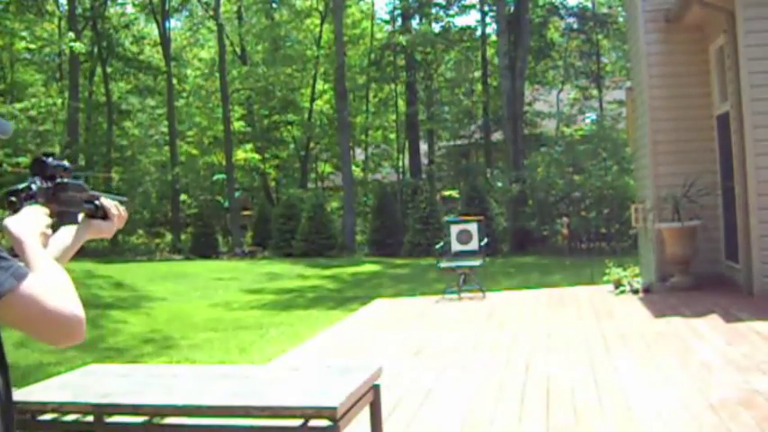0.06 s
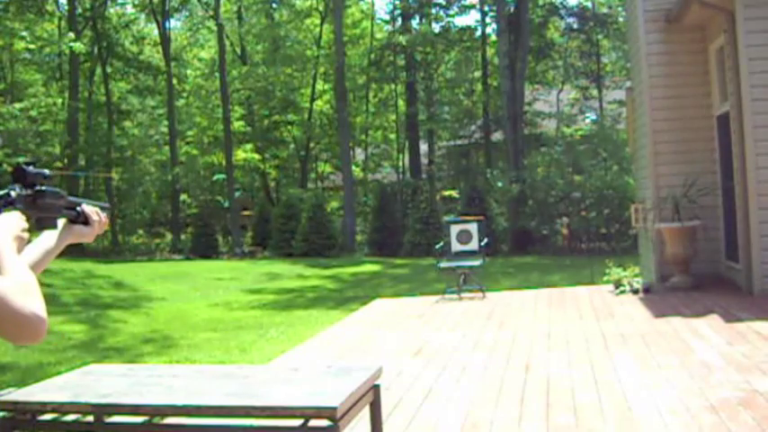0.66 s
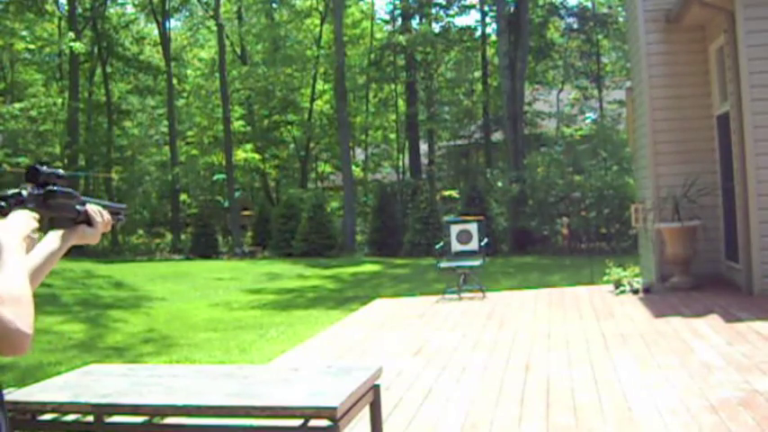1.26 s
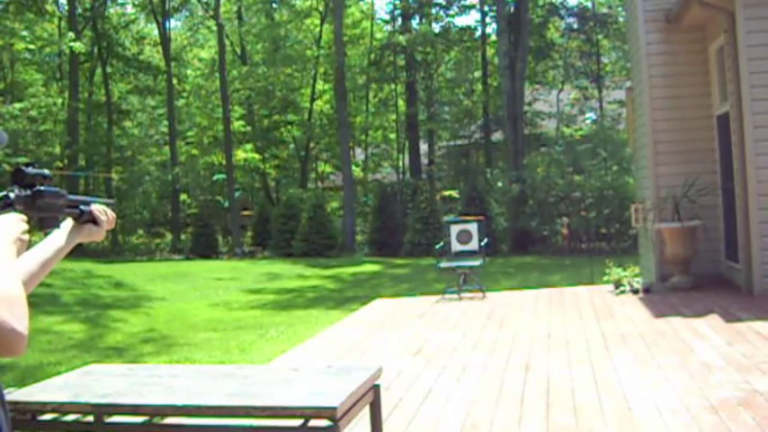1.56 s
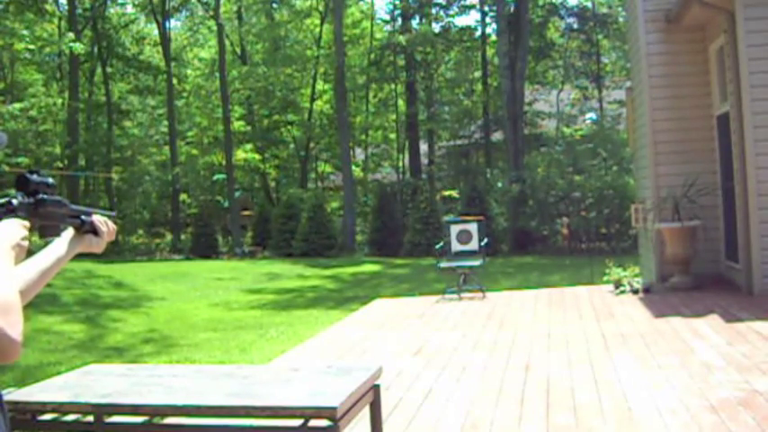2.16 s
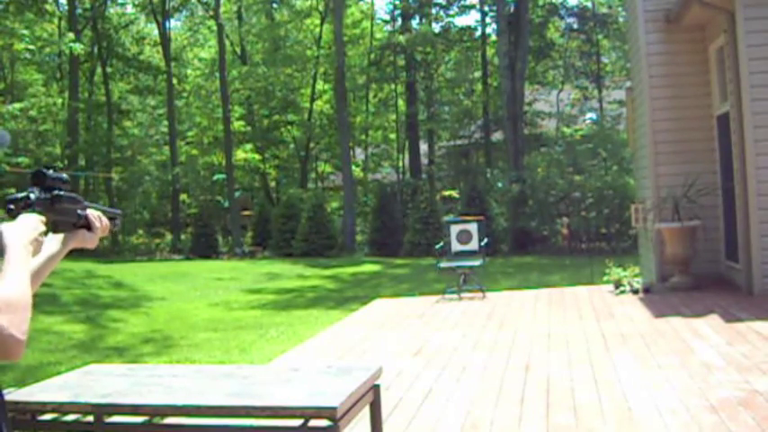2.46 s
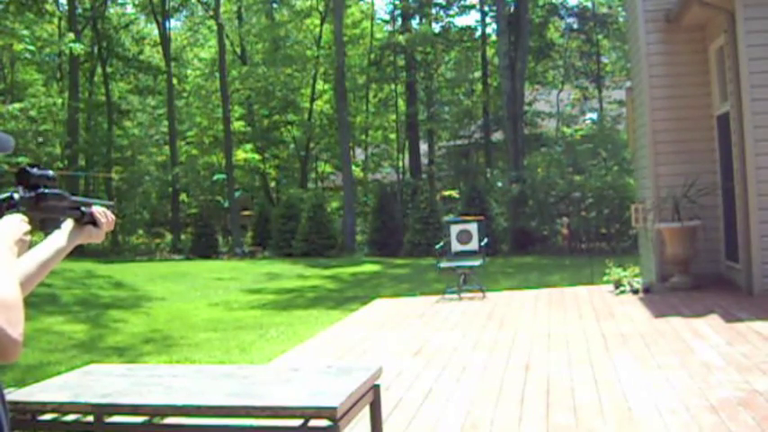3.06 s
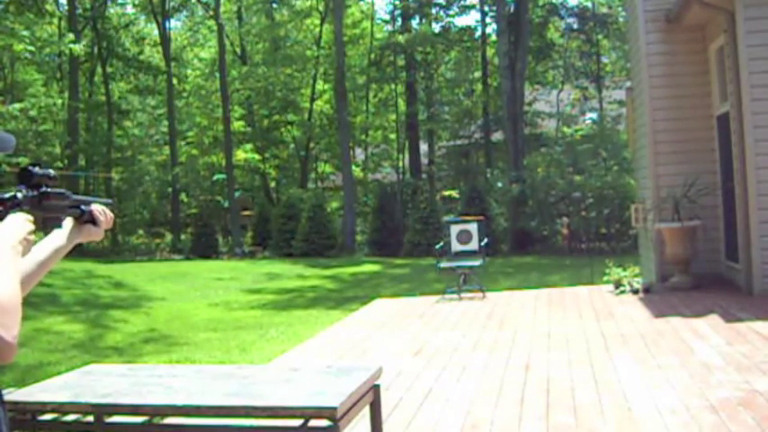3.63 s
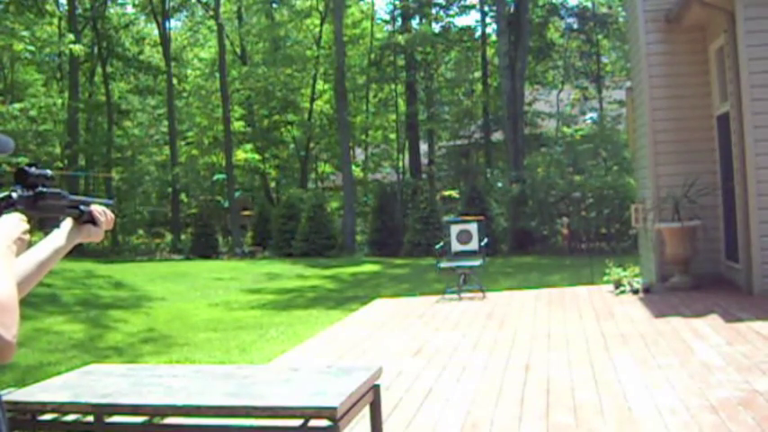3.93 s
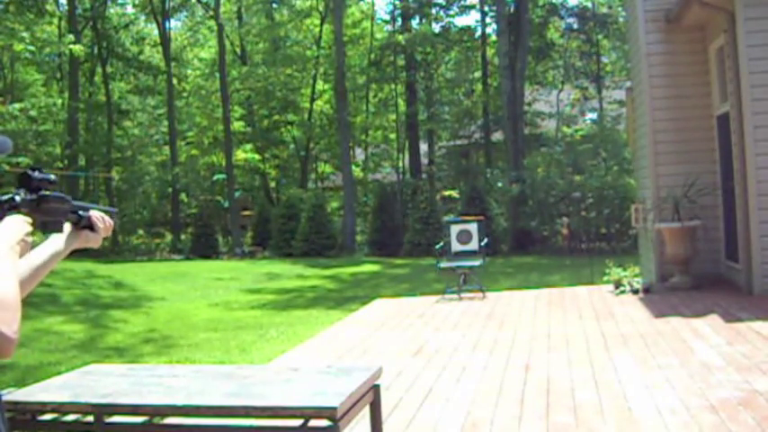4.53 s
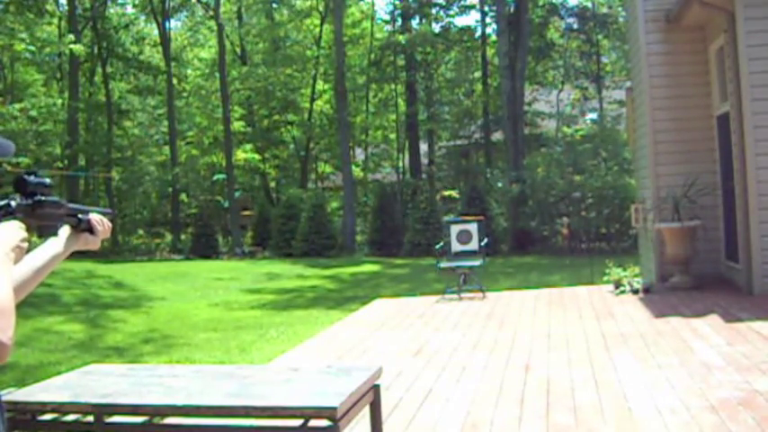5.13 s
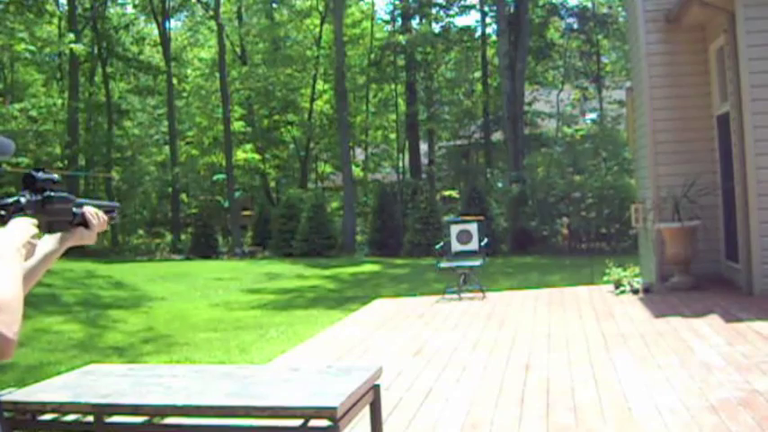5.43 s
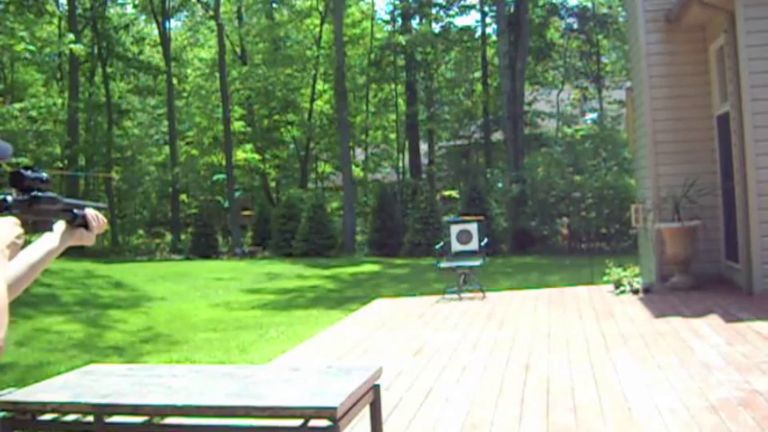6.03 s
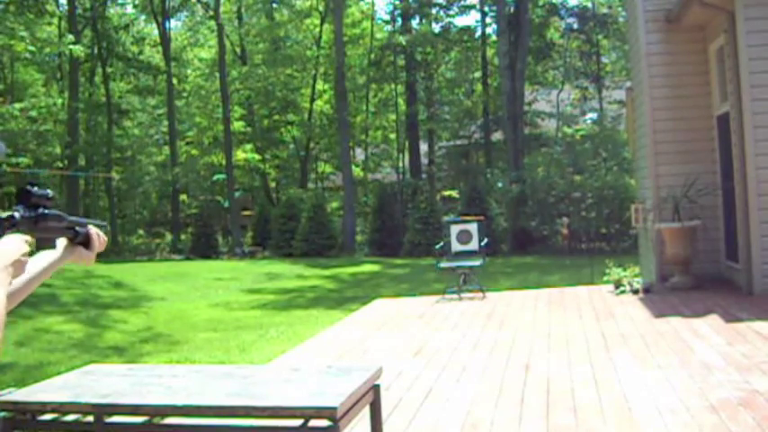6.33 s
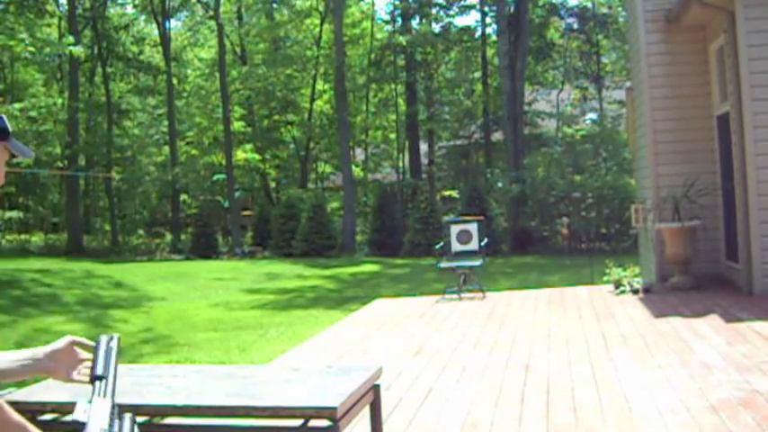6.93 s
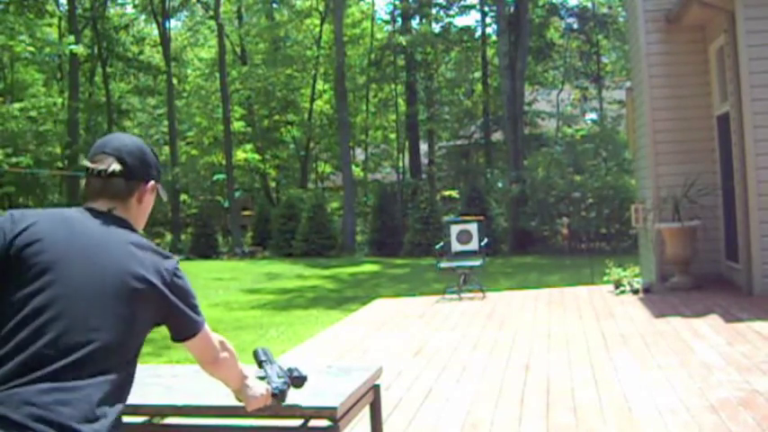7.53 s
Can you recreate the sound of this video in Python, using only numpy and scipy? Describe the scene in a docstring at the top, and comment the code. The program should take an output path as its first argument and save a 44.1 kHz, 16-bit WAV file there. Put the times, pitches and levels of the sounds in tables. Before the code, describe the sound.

A spring-powered toy shotgun fires six times, about once a second, each shot a sharp clack with a pop of air. Between shots the plastic pump clatters back and slams shut. Four pellets crack against a target that rings faintly. Finally the gun is set on a table with light taps. The back yard adds short echoes and soft outdoor air, heard through a dull microphone that overloads slightly.

```python
"""A spring airsoft shotgun is fired six times in a back yard, pumped between shots, then laid on a table.
Each shot is a trigger click, a piston slam and a pop of air; four pellets hit a target, which rings on.
House wall and trees throw the clacks back over outdoor air and the faint hum of a distant machine.
A narrow-band camera microphone overloads on the loudest hits."""
import sys
import numpy as np
from scipy import signal
from scipy.fft import rfft, irfft, next_fast_len
from scipy.io import wavfile
from scipy.ndimage import uniform_filter1d

SR = 44100
rng = np.random.default_rng(int(sys.argv[2]) if len(sys.argv) > 2 else 0)


def unload_wav(signal):
    """Save mono or channel-first audio to the path in sys.argv[1] as 16-bit WAV at rate SR, clipped to [-1, 1]."""
    wavfile.write(
        sys.argv[1],
        SR,
        np.round(np.clip(np.atleast_2d(signal).T, -1, 1) * 32767).astype(np.int16),
    )


N = 343358
MIC_BAND_HZ = 3672
BOUNCE_S = .0052  # time between rebounds against a stop

# The six shots. Each row: slam time in seconds, slam level in dB, rattle length in seconds,
# stock thump in dB, muzzle pop in dB, pop pitch in Hz, barrel note in dB against the pop,
# slam tilt in dB per octave, trigger lead in seconds, trigger level in dB.
SHOTS = [(0.993, 1, .006, -8, -21, 2800, -15, 6.5, .0053, -14),
         (2.1084, 2, .0054, -7.5, 0, 1830, -14.5, 0, .0088, -6.5),
         (3.3395, -3, .008, -7.5, -14.5, 1860, -10, .8, .0058, -9),
         (4.3227, -2.5, .0084, -8, -12.5, 1900, -16, 0, .0051, -4.5),
         (5.2939, -3.5, .008, -9, -11.5, 1960, -19, -.5, .0063, -9),
         (6.24, 1, .0066, -7, -9, 2030, 3, .5, .0077, -9.5)]
# Tone of the pump rail. Each row: frequency in Hz, level in dB.
RAIL_TONE = [(80, -28), (250, -19), (440, -4), (850, -8.5), (1230, -16), (1700, -10), (2100, 3), (2600, 0),
             (3100, -0.5), (3700, -1.5)]
# Tone of the gun's shell. Each row: frequency in Hz, level in dB.
SHELL_TONE = [(100, -21), (600, -2.5), (1250, -15.5), (2200, -0.5), (3000, 5), (3800, -4)]


def amp(db):
    return 10 ** (np.asarray(db) / 20)


def unit_rms(x):
    return x / np.sqrt(np.mean(x ** 2) + 1e-20)


def curve(points, hz):
    """Straight lines between points on a log-frequency axis."""
    f, value = np.transpose(points)
    return np.interp(np.log(hz + 1), np.log(f + 1), value)


def add(mix, start_s, sound):
    part = mix[round(start_s * SR):][:len(sound)]
    part += sound[:len(part)]


def drift(rate_hz):
    """A slow random wander of unit size."""
    hz = np.fft.rfftfreq(N, 1 / SR)
    return unit_rms(irfft(rfft(rng.standard_normal(N)) / (1 + (hz / rate_hz) ** 4), N))


def colour(x, tone, tilt_db=0):
    """Minimum-phase EQ with a tilt per octave, closed above the microphone's band."""
    size = next_fast_len(2 * len(x))
    hz = abs(np.fft.fftfreq(size, 1 / SR))
    db = curve(tone, hz) + tilt_db * np.log2((hz + 200) / 2000) - np.clip((hz - 3900) / 15, 0, 50)
    response = np.exp(np.conj(signal.hilbert(np.log(amp(db)))))
    return np.fft.ifft(np.fft.fft(x, size) * response).real[:len(x)]


def flatten(x, window):
    """Spreads a burst evenly over all frequencies while keeping it inside its time window."""
    for _ in range(4):
        z = rfft(x)
        x = irfft(z / (abs(z) + 1e-12), len(x)) * window
    return x


def burst(decay_s):
    """A dying puff of noise with an even spectrum."""
    t = np.arange(4096) / SR
    noise = rng.standard_normal(len(t)) * np.exp(-t / decay_s)
    return flatten(noise, np.exp(-(t / (3.4 * decay_s)) ** 2))


def knock(tone, ring_s, tilt_db=0):
    """A blow on crowded, quickly dying modes; its first moments have about unit level."""
    x = colour(burst(ring_s), tone, tilt_db)
    return x * np.sqrt((ring_s / 2 + .0006) * SR / np.sum(x ** 2))


def bounces(tone, ring_s, loss_db, count=4, jitter=.2):
    """A blow against a stop and its ever weaker, slightly uneven rebounds."""
    out = np.zeros(SR // 5)
    for k, chance in enumerate(rng.uniform(-1, 1, count)):
        delay = BOUNCE_S * (k + jitter * chance * min(k, 1))
        add(out, delay, amp(loss_db * np.log2(1 + k)) * knock(tone, ring_s))
    return out


def slide(length_s, slips_per_s=2200):
    """Tiny slips of plastic that swell and fade over one stroke."""
    n = round(length_s * SR)
    slips = rng.choice([-1, 1], n) * (rng.random(n) < slips_per_s / SR)
    strength = amp(np.minimum(rng.exponential(1, n), 3))
    return unit_rms(colour(slips * strength, RAIL_TONE)) * signal.windows.tukey(n, .5)


def air_and_hum():
    """A bed of outdoor air and hiss, with the wavering hum of a distant machine."""
    # Tone of the air. Each row: frequency in Hz, relative level in dB.
    air_tone = [(12, -36.5), (20, -7.5), (59, -7), (92, 2), (130, -11.5), (148, -12.5), (281, -14.5),
                (388, -15.5), (492, -10), (596, -17), (806, -13.5), (917, -17.5), (1110, -19.5),
                (1670, -21), (3400, -24)]
    # The machine's notes. Each row: frequency in Hz, level in dB.
    hum_notes = [(87.5, -44), (120.2, -45.5)]
    hz, t = np.fft.rfftfreq(N, 1 / SR), np.arange(N) / SR
    spectrum = rfft(rng.standard_normal(N)) * amp(curve(air_tone, hz)) * (hz < 4200)
    spectrum *= amp(curve([(50, 1), (80, -8.5), (120, -6.5), (170, 0)], hz))  # room for the hum
    air = irfft(spectrum, N) / np.std(irfft(spectrum * (hz > 150), N))
    hum = np.zeros(N)
    for note_hz, db in hum_notes:
        level = amp(db + 2.1 * drift(3.16)) * np.sqrt(2)
        hum += level * np.sin(2 * np.pi * note_hz * t + .63 * drift(2))
    return amp(-39) * air * amp(.5 * drift(3.53)) + hum


def handling(squeeze_lead_s=.037, squeeze_db=-31, table_knocks=3):
    """The shell taps in the hands, the trigger creaks, and at last the gun scrapes onto the table."""
    # Taps on the shell. Each row: start in seconds, level in dB.
    taps = [(.431, -26), (.4624, -25), (.9124, -24), (2.323, -25), (5.5279, -22), (7.5325, -19)]
    # Laying the gun down: start and end in seconds, scrape level and knock level in dB.
    lay_down = (7.604, 7.741, -48, -33)
    out = np.zeros(N)
    squeezes = [(shot[0] - squeeze_lead_s, squeeze_db) for shot in SHOTS]
    for start, db in taps + squeezes:
        add(out, start, amp(db) * knock(SHELL_TONE, .0018))
    start, end, scrape_db, knock_db = lay_down
    add(out, start, amp(scrape_db) * slide(end - start))
    for k, chance in enumerate(rng.uniform(-.15, .15, table_knocks)):
        progress = (k + 1 + chance) / (table_knocks + 1)
        add(out, start + (end - start) * progress, amp(knock_db) * knock(SHELL_TONE, .0018))
    return out


def shots(rush_db=-19, pop_width_hz=560, barrel_hz=1010, barrel_width_hz=440):
    """The trigger trips, the piston rushes, slams into the stock and rattles; air pops from the barrel."""
    # Tone of the piston's clack. Each row: frequency in Hz, level in dB.
    piston_tone = [(60, -35.5), (170, -13.5), (400, -19), (930, -7.5), (1250, -21.5), (1600, -8),
                   (2100, 0.5), (2500, -4.5), (3200, -4.5), (3800, -16.5)]
    # Tone of the stock's thump. Each row: frequency in Hz, level in dB.
    stock_tone = [(60, -23), (200, -8), (330, -7.5), (490, 2), (690, -7.5), (950, -1), (1250, -23),
                  (3000, -31.5)]
    gun, muzzle, hz = np.zeros(N), np.zeros(N), np.fft.rfftfreq(1024, 1 / SR)
    for slam, db, rattle, thump_db, pop_db, pop_hz, barrel_db, tilt_db, lead, trigger_db in SHOTS:
        add(gun, slam - lead, amp(trigger_db) * knock(SHELL_TONE, .0016))
        add(gun, slam - lead, amp(rush_db) * slide(lead + rattle))
        for share, bounce_db in [(0, -3), (.42, 5.5), (.9, 1.5)]:
            add(gun, slam + share * rattle, amp(db + bounce_db) * knock(piston_tone, .0024, tilt_db))
        add(gun, slam + .001, amp(thump_db) * knock(stock_tone, .0055))
        # the air column has two broad resonances
        pop = 1 / (1 + (2 * (hz - pop_hz) / pop_width_hz) ** 2)
        barrel = amp(barrel_db) / (1 + (2 * (hz - barrel_hz) / barrel_width_hz) ** 2)
        column_tone = np.c_[hz, 20 * np.log10(pop + barrel)]
        add(muzzle, slam, amp(pop_db) * knock(column_tone, .009))
    return gun, muzzle


def pump_back(margin_s=.024):
    """The pump unlocks, slides back and clatters against its stop; then the sear catches the piston."""
    # Back strokes. Each row: time in seconds and level in dB for the unlock, the back stop
    # and the sear in turn, then slide level in dB.
    strokes = [(1.5164, -11.5, 1.5603, -9, 1.5708, -8.5, -30), (2.7074, -15, 2.7578, -8.5, 2.790, -15, -30),
               (3.671, -19.5, 3.7333, -10, 3.765, -9, -32), (4.6495, -19, 4.7122, -10, 4.7465, -17, -34),
               (5.6165, -19, 5.6732, -11, 5.7028, -12.5, -31)]
    # Tone of the sear's click. Each row: frequency in Hz, level in dB.
    sear_tone = [(100, -31.5), (400, -17), (800, -10), (1200, -37), (1950, -26.5), (2420, 4.5),
                 (2800, -0.5), (3300, -7), (3800, -25.5)]
    out = np.zeros(N)
    for unlock, unlock_db, stop, stop_db, sear, sear_db, slide_db in strokes:
        add(out, unlock - .0055, amp(unlock_db - 6.5) * knock(RAIL_TONE, .002))  # slack is taken up
        add(out, unlock, amp(unlock_db) * knock(RAIL_TONE, .0032))
        add(out, unlock - margin_s, amp(slide_db) * slide(sear - unlock + 2 * margin_s))
        add(out, stop - .0105, amp(stop_db - 12) * knock(RAIL_TONE, .003))  # catches on the rail
        add(out, stop, amp(stop_db) * bounces(RAIL_TONE, .0025, loss_db=-9))
        add(out, sear, amp(sear_db) * knock(sear_tone, .0018))
    return out


def pump_forward(margin_s=.016):
    """The feed clicks and seats a pellet; the pump slides home, meets its stop, grinds and slams shut."""
    # Forward strokes. Each row: time in seconds and level in dB for the feed click, the first touch
    # and the closing slam in turn, then slide level in dB.
    strokes = [(1.7046, -16, 1.7655, -5.5, 1.7705, -2, -37), (2.922, -19, 2.994, -6.5, 2.9985, -2.5, -36),
               (3.873, -19, 3.944, -11, 3.955, -2.5, -37), (4.859, -19, 4.941, -9, 4.9458, -2.5, -39),
               (5.8278, -20.5, 5.9046, -11, 5.9188, -3.8, -38)]
    # Tone of the feed's click. Each row: frequency in Hz, level in dB.
    feed_tone = [(100, -27.5), (450, -16.5), (780, -6.5), (1250, -30.5), (1750, -20.5), (2120, 6.5),
                 (2550, -14), (3200, -9.5), (3800, -21.5)]
    # Tone of the front stop. Each row: frequency in Hz, level in dB.
    stop_tone = [(70, -48.5), (220, -22), (430, 0.5), (700, 0.5), (950, -3), (1260, -18.5), (1700, -5.5),
                 (2250, 3), (2800, 2.5), (3500, -1), (3800, -4)]
    out = np.zeros(N)
    for feed, feed_db, touch, touch_db, shut, shut_db, slide_db in strokes:
        add(out, feed, amp(feed_db) * knock(feed_tone, .0018))
        add(out, feed + .034, amp(feed_db - 12) * knock(SHELL_TONE, .0018))  # the pellet seats
        add(out, feed - margin_s, amp(slide_db) * slide(shut - feed + 2 * margin_s))
        add(out, touch, amp(touch_db) * bounces(stop_tone, .0022, loss_db=-6, count=2))
        add(out, touch, amp(touch_db - 10) * slide(shut - touch + BOUNCE_S))  # the grind
        add(out, shut, amp(shut_db) * bounces(stop_tone, .0018, loss_db=-7, count=3))
    return out


def target_hits(waver_db=3, bloom_s=.06):
    """Each pellet cracks on the face; the backing thuds and the loose stand blooms into a wavering ring."""
    # Pellet hits. Each row: start in seconds, crack level in dB, crack tilt in dB per octave,
    # then the levels of scattered crack, ring and thud in dB.
    pellets = [(2.3318, 4.5, 0, -5.5, -30, -22), (3.4732, 3.5, 0, -5, -28.5, -13.5),
               (4.4566, 2, 4.5, -8.5, -27.5, -38), (5.4288, -23, 0, -12, -27, -38)]
    # Modes of the target and its stand. Each row: frequency in Hz, level in dB, T60 in seconds.
    modes = [(124.3, 0, 0.725), (153, -6, 0.86), (188.6, -5.5, .6), (274, -10.5, 1), (342, -3, 1.0),
             (377, -2.5, .6), (674, -7.5, 1), (740, -5.5, 0.95), (884, -1, 0.84), (1023, 2, 0.21)]
    # Tone of the crack on the face. Each row: frequency in Hz, level in dB.
    crack_tone = [(100, -13), (300, -22), (750, -9.5), (1200, -17.5), (1900, -12), (2500, -4), (3200, -5.5),
                  (3800, -9.5)]
    # Tone of the backing's thud. Each row: frequency in Hz, level in dB.
    thud_tone = [(80, -32), (300, 0.5), (500, 5.5), (800, 4), (1300, -24), (3800, -58)]
    out, scattered, t = np.zeros(N), np.zeros(N), np.arange(SR) / SR
    for start, crack_db, tilt_db, scatter_db, ring_db, thud_db in pellets:
        add(out, start, amp(crack_db) * knock(crack_tone, .00027, tilt_db))
        add(out, start + .00667, amp(thud_db) * knock(thud_tone, .01))
        add(out, start + .00201, amp(scatter_db - 14) * knock(crack_tone, .029))
        add(scattered, start, amp(scatter_db) * knock(crack_tone, .004))  # send to the trees
        for hz, db, t60 in modes:
            swell, sway = unit_rms(uniform_filter1d(rng.standard_normal((2, SR)), size=1200))
            envelope = amp(db + waver_db * swell - 60 * t / t60) * (1 - np.exp(-t / bloom_s))
            note = np.sin(2 * np.pi * (hz * t + rng.random()) + .5 * sway)
            add(out, start, amp(ring_db) * envelope * note)
    return out, scattered


def loose_parts(x, db, decay_s, count=3):
    """Spring, magazine and stock add a short buzz to every blow, never twice alike."""
    out, turn = x.copy(), np.arange(N) * 70 / SR
    for part in range(count):
        buzz = burst(decay_s)
        share = np.cos(2 * np.pi * (turn + part / count)) ** 2  # the parts take turns
        out += amp(db) * signal.oaconvolve(x * share, buzz / np.linalg.norm(buzz))[:N]
    return out


def wall_echo(x, siding_s=.026, corner_s=.046, slap_gain=.42):
    """Deck and furniture scatter at once; the flat siding slaps back later, then the house corner."""
    # Tone of the early echoes. Each row: frequency in Hz, level in dB.
    wall_tone = [(100, -3.5), (400, 0), (750, 0.5), (1050, 4), (1800, -3), (2400, -6), (3500, -4)]
    t = np.arange(SR // 8) / SR
    times = [.004, .012, siding_s - .004, siding_s, siding_s + .005, corner_s, corner_s + .021, .11]
    envelope = amp(np.interp(t, times, [-38.5, -6, -6, -3, -5, -1, -13.5, -44]))
    echoes = colour(flatten(rng.standard_normal(len(t)) * envelope, envelope ** (1 / 4)), wall_tone)
    echoes *= np.sqrt(2 * MIC_BAND_HZ / SR) / np.linalg.norm(echoes)
    out = signal.oaconvolve(x, echoes)[:N] * amp(-1.5)
    add(out, siding_s, slap_gain * x)
    return out


def tree_echo(x, rise_s=.058, paths=3):
    """Trunks and leaves scatter a long faint tail; successive blows take different paths."""
    # Tone of the tail. Each row: frequency in Hz, level in dB.
    tail_tone = [(100, -3.5), (500, 0.5), (1200, -5), (2100, -5.5), (3500, -5)]
    # How long the trees hold the sound. Each row: frequency in Hz, T60 in seconds.
    tail_t60 = [(200, 0.29), (1000, 1), (2000, 0.98), (3500, 1)]
    out, turn = np.zeros(N), np.arange(N) * 45 / SR
    for path in range(paths):
        hz, t, bands = signal.stft(rng.standard_normal(SR), SR, nperseg=256)
        bands = bands * amp(-60 * t / curve(tail_t60, hz)[:, None]) * (1 - np.exp(-t / rise_s))
        tail = colour(signal.istft(bands, SR, nperseg=256)[1], tail_tone)
        share = np.cos(2 * np.pi * (turn + path / paths)) ** 2
        out += signal.oaconvolve(x * share, tail / np.linalg.norm(tail))[:N]
    return out * np.sqrt(2 * MIC_BAND_HZ / SR)


def scene():
    """Gun, target, yard echoes and background in a mono mix."""
    gun, muzzle = shots()
    gun = loose_parts(gun, db=-12, decay_s=.012)
    clatter = loose_parts(pump_back() + pump_forward() + handling(), db=-6, decay_s=.0096)
    hits, scattered = target_hits()
    # the barrel points down the yard, so its pop has the gun's strongest echo send
    near = wall_echo(amp(-12.5) * gun + amp(-.7) * muzzle + amp(-13) * clatter)
    far = tree_echo(amp(-23.5) * gun + amp(-12.5) * muzzle + amp(-25.5) * clatter
                    + amp(-11.5) * scattered)
    return (gun + muzzle + clatter + hits + near + far + air_and_hum())[None]


def record(dry, ceiling=.94, hardness=11, top_hz=16200):
    """A microphone as dull as a telephone, then overload that spits treble on the loudest peaks."""
    mic_lowpass = signal.firwin(281, MIC_BAND_HZ, window=("kaiser", 8), fs=SR)
    top_lowpass = signal.firwin(255, top_hz, window=("kaiser", 9), fs=SR)
    narrow = signal.oaconvolve(dry, mic_lowpass[None], "same")
    clipped = narrow / (1 + abs(narrow / ceiling) ** hardness) ** (1 / hardness)
    return signal.oaconvolve(clipped, top_lowpass[None], "same")


dry = scene()
out = record(dry)
unload_wav(out)
```